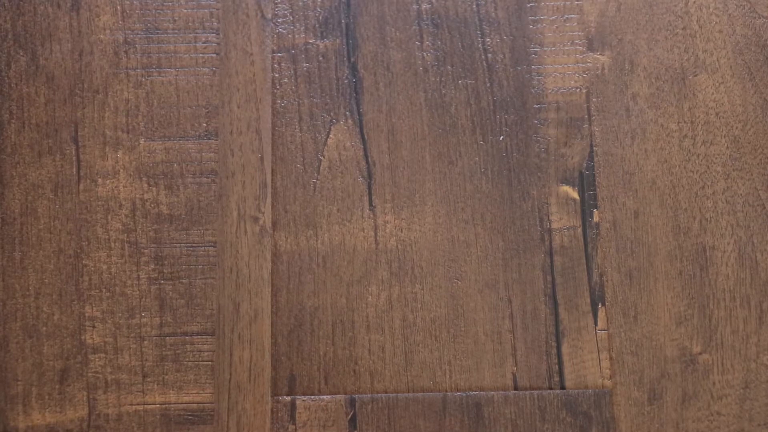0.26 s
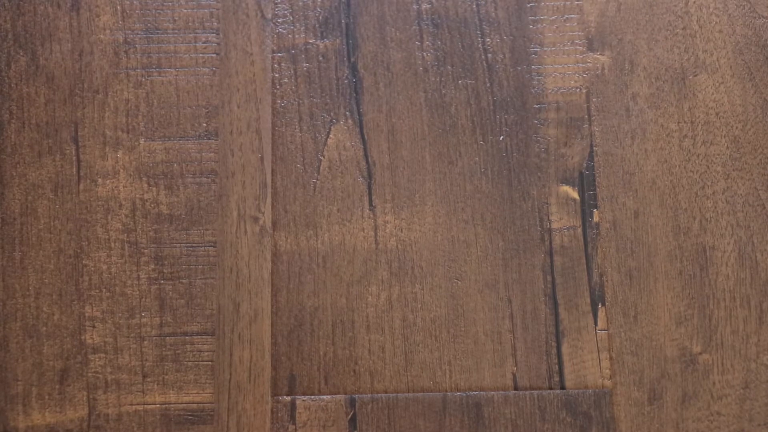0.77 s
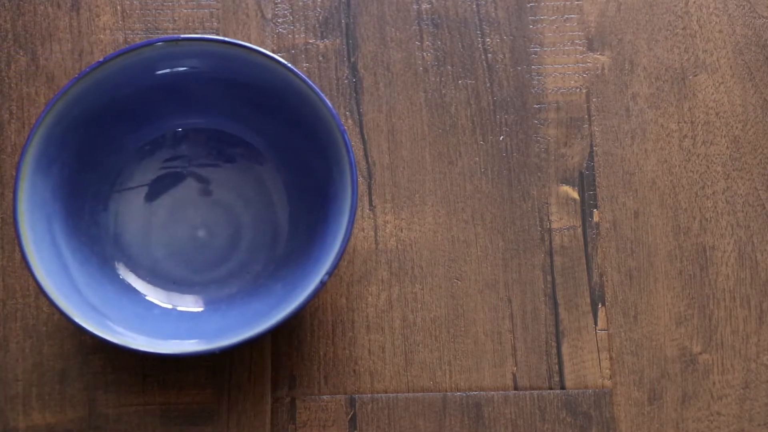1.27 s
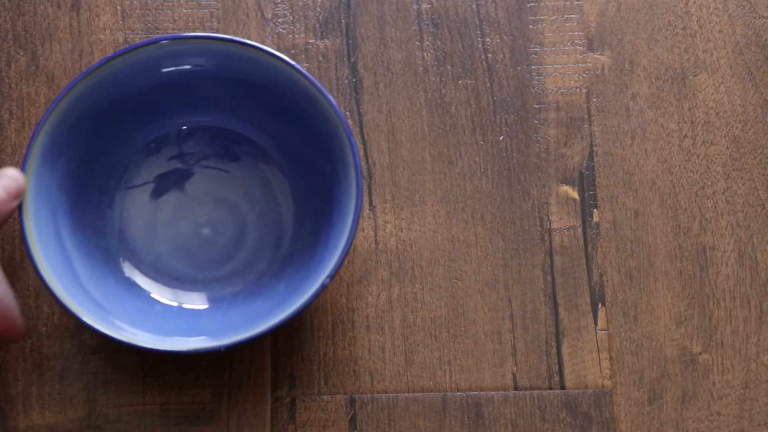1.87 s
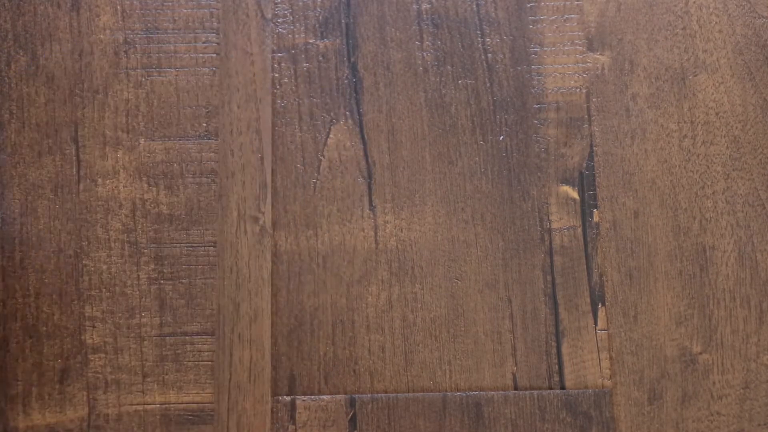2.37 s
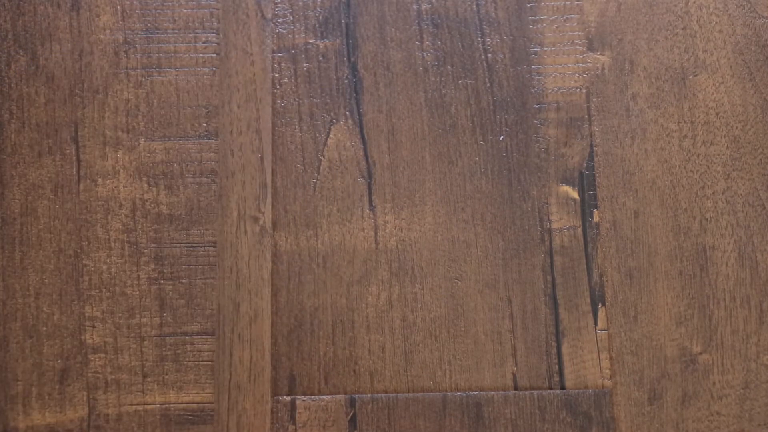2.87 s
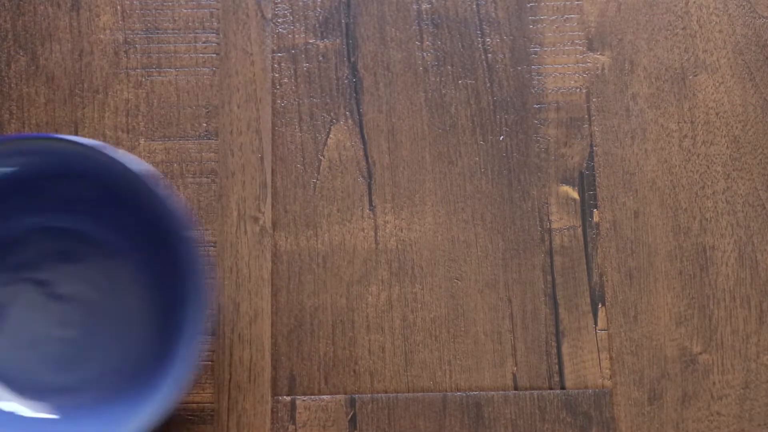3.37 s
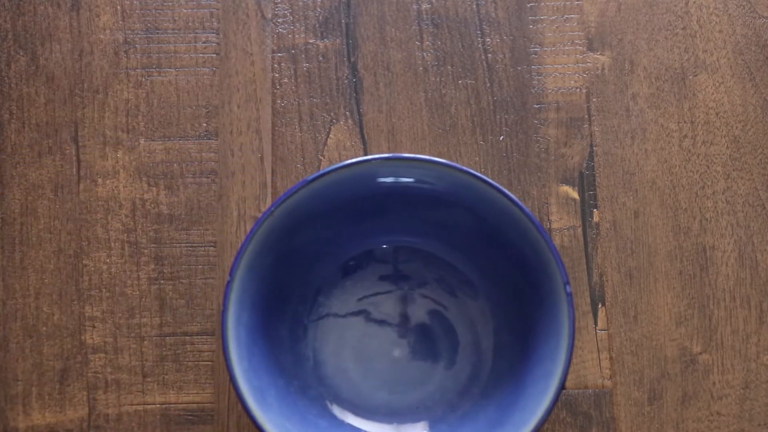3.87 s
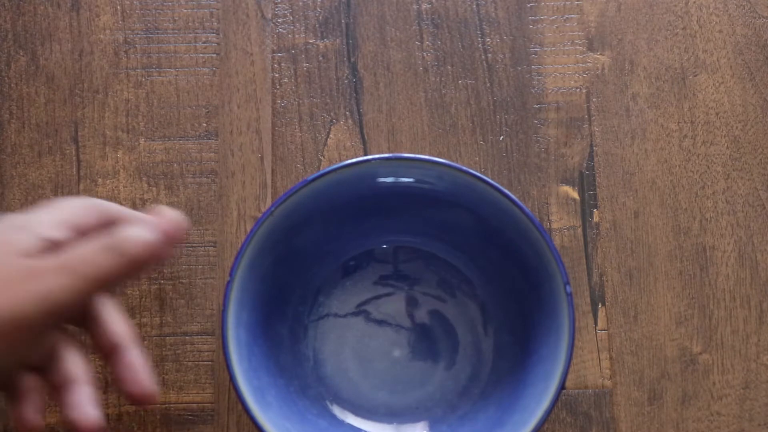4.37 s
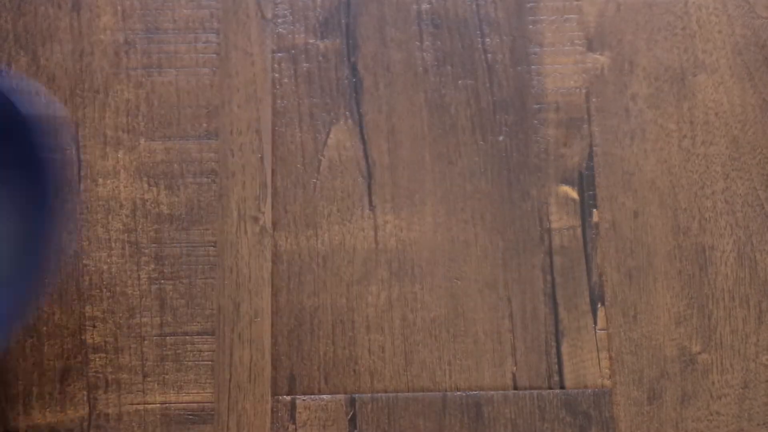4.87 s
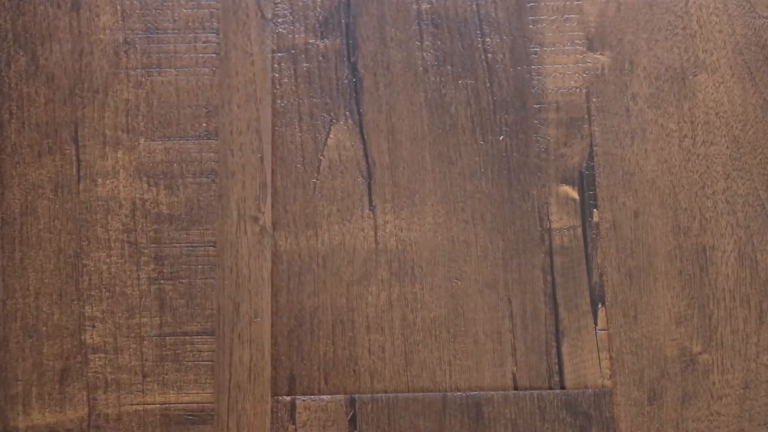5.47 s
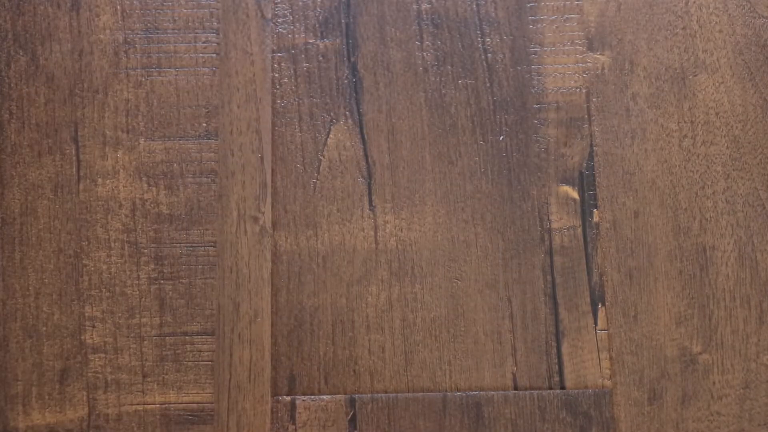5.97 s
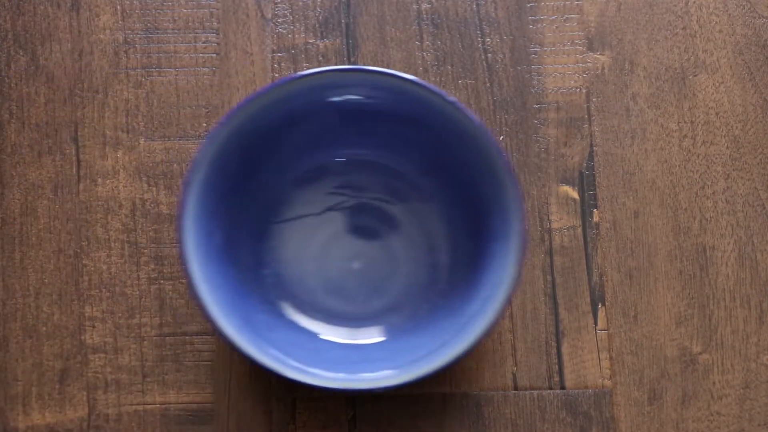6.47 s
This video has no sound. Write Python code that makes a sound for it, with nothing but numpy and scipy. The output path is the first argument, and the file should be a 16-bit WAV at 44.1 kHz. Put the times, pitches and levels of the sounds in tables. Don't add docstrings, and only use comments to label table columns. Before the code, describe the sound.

A quiet indoor room with low hum, soft hiss and faint far traffic, heard close to a wooden table. At about 0.45 s come small light taps, then from 0.7 to 1.35 s a ceramic bowl slides over the planks: a hollow rumbling scrape with gritty hiss, thin high singing and a hard knock near 0.96 s. It settles with a very faint ring. Cloth rustles softly around 1.8 s, with a tiny shift near 2 s and weak taps at 2.2 s. The second slide starts softly near 3.1 s, knocks hard at 3.36 s and bumps along until 3.85 s, leaving a faint ring. A sleeve rustles at 4.4 s; lifting clatters lightly at 4.6-4.7 s, followed by another rustle. Bumps and short chatter come at 5.5-5.8 s, a brief gap, then the third scrape from 5.95 s, with strong knocks near 6.2 s, fading by 6.7 s.

```python
import sys
import numpy as np
from scipy import signal
from scipy.fft import rfft, irfft, next_fast_len
from scipy.io import wavfile
from scipy.ndimage import uniform_filter1d, map_coordinates

SR = 44100
rng = np.random.default_rng(int(sys.argv[2]) if len(sys.argv) > 2 else 0)


def decibels_to_gain(level_db):
    exponent = np.asarray(level_db, float) / 20
    return 10 ** exponent


def log_audio(samples):
    frames = np.atleast_2d(samples).T
    limited = np.clip(frames, -1, 1)
    pcm = np.round(limited * 32767).astype(np.int16)
    wavfile.write(sys.argv[1], SR, pcm)


N = 295911

# frequency in Hz, level in dB, t60 in seconds.
LOW_MODES = [(300, -14, .02), (390, -10, .02), (460, -9, .02), (515, -8, .025), (650, -15, .016)]
HIGH_MODES = [(880, -4, .016), (1000, 0, .016), (1150, -2, .014), (1350, -9, .012)]
# frequency in Hz, level in dB per Hz.
GRAIN_SPECTRUM = [(900, -30.5), (1300, 3), (1700, 1.5), (2300, 0.5), (2900, -1.5), (3300, -4), (3600, -15),
                  (4400, -22), (6000, -32.5)]
GRIT_SPECTRUM = [(1800, -17), (2500, -4), (3100, 1.5), (3700, 0.5), (5000, -5), (7000, -9), (9000, -11.5),
                 (10500, -33), (13000, -27), (15700, -34.5)]
# time in seconds, peak in dB, rattle in dB over the knock,
# upper boom in dB over the knock, plank frequency in Hz.
KNOCKS = [(0.452, -23, -34, -23, 487), (0.475, -24.5, -28, -20, 460), (0.682, -34, -36, -29, 354),
          (0.961, -9, -16.5, -3, 453), (2.185, -31, -28, -5, 312), (2.233, -34, -25.5, -15, 520),
          (3.357, -13.5, -15.5, -18, 447), (3.369, -9.5, -33, -11, 466), (4.565, -36.5, -35, -12, 303),
          (4.587, -46, -26, -1, 620), (4.644, -18, -32, -14, 536), (4.676, -23, -27, -9.5, 476),
          (4.691, -24.5, -23, -8.5, 510), (5.464, -16, -20, -7.5, 514), (5.505, -22, -36, -9, 524),
          (5.703, -19, -22.5, -12, 514), (5.967, -21.5, -21.5, -20, 502), (6.178, -10, -18, -13, 500),
          (6.188, -10.5, -33, -10, 526), (6.201, -9.5, -23, -7.5, 490), (6.392, -11, -36, -15, 625),
          (6.622, -23.5, -34, -10.5, 500)]
PLANK_HZ, PLANK_WIDTH_HZ = 520, 9.8


def unit(x):
    return x / np.sqrt(np.mean(x ** 2) + 1e-20)


def along(points, hz):
    f, v = np.transpose(points)
    return np.interp(np.log(hz + 1), np.log(f + 1), v)


def filtered(x, response):
    m = next_fast_len(N + SR)
    hz = np.fft.rfftfreq(m, 1 / SR)
    return irfft(rfft(x, m) * response(hz), m)[:N]


def shaped(x, spectrum):
    return filtered(x, lambda hz: decibels_to_gain(along(spectrum, hz)))


def coloured(x, spectrum):
    return unit(shaped(x, spectrum))


def resonance(hz, width):
    return lambda f: 1j * f * width / (hz * hz - f * f + 1j * f * width)


def wobble(rate):
    knots = rng.standard_normal(int(N * rate / SR) + 4)
    return map_coordinates(knots, [np.arange(N) * rate / SR])


def asperities(rate, spread_db):
    touch = rng.random(N) < rate / SR
    sign = rng.choice([-1, 1], N)
    return unit(touch * sign * decibels_to_gain(spread_db * rng.standard_normal(N)))


def gains(tables):
    t = np.arange(N) / SR
    out = 0
    for rows in tables:
        s, *columns = np.transpose(rows)
        out = out + np.array([decibels_to_gain(np.interp(t, s, c, left=-200, right=-200)) for c in columns])
    return out


def dying(rows):
    t = np.arange(N) / SR
    return sum((t >= s) * decibels_to_gain(db - 60 * np.abs(t - s) / t60) for s, db, t60 in rows)


def swells(rows):
    t = np.arange(N) / SR
    return sum(decibels_to_gain(db) * np.exp(-.5 * ((t - s) / half) ** 2) for s, half, db in rows)


def ambience():
    # frequency in Hz, level in dB per Hz.
    rumble_spectrum = [(15, -47), (25, -17), (38, -2), (66, 0.5), (81, 11.5), (157, 4), (170, -33),
                       (220, -41.5), (370, -120)]
    hum_spectrum = [(90, -29.5), (140, -5.5), (280, -3), (330, 1), (430, -7.5), (800, -10), (1100, -12.5),
                    (1600, -18), (2500, -30.5), (3300, -43.5), (5500, -120)]
    hiss_spectrum = [(880, -38.5), (1500, 0), (2160, 0.5), (2310, -1.5), (3660, -2.5), (7880, -5.5),
                     (15700, -9)]
    # nearest moment in seconds, half length in seconds, level in dB.
    vehicles = [
        (0.0, .2, -84),
        (3.17, 0.16, -66),
        (3.6, 0.17, -77),
        (4.5, 0.38, -69.5),
        (6.1, .5, -77),
    ]
    # time in seconds, level in dB.
    hum_level = [(0, -66.5), (2.8, -66.5), (2.9, -62.5), (4.95, -63.5), (5.4, -67.5), (6.71, -57.5)]
    steady_traffic_db, hiss_db = -74, -74.5
    low = unit(decibels_to_gain(1.6 * wobble(4)) * coloured(rng.standard_normal(N), rumble_spectrum))
    mid = unit(decibels_to_gain(1.2 * wobble(4.3)) * coloured(rng.standard_normal(N), hum_spectrum))
    hiss = decibels_to_gain(hiss_db) * coloured(rng.standard_normal(N), hiss_spectrum)
    traffic = (decibels_to_gain(steady_traffic_db) + swells(vehicles)) * low
    return traffic + gains([hum_level])[0] * mid + hiss


def room(x):
    # frequency in Hz, t60 in seconds.
    decay = [(200, 0.282), (1000, 0.24), (4000, 0.18), (12000, 0.18)]
    hz, t, z = signal.stft(rng.standard_normal(SR // 2), SR, nperseg=256)
    fading = decibels_to_gain(-60 * t / along(decay, hz)[:, None])
    tail = signal.istft(z * fading, SR, nperseg=256)[1]
    delayed = np.pad(x, (200, 0))
    return signal.fftconvolve(delayed, tail / np.linalg.norm(tail))[:N]


def sleeve():
    # middle in seconds, half length in seconds, level in dB.
    passes = [(1.565, 0.035, -73), (1.8, 0.15, -70), (2.386, 0.031, -71.5), (4.15, 0.051, -76),
              (4.38, .1, -67.5), (4.845, 0.044, -63.5), (5.365, 0.011, -72)]
    # frequency in Hz, level in dB per Hz.
    cloth_spectrum = [(710, -45), (1200, -1), (1460, 1), (1670, 2), (5180, -3), (6150, 0), (9350, -6.5),
                      (15700, -17)]
    return swells(passes) * decibels_to_gain(1.5) * coloured(asperities(9000, spread_db=2.0), cloth_spectrum)


def specks():
    # time in seconds, peak in dB.
    cracks = [(1.002, -32), (1.078, -42), (1.967, -49), (3.127, -45.5), (3.169, -41), (4.677, -36.5),
              (6.378, -28), (6.53, -38)]
    t = np.arange(SR // 50) / SR
    out = np.zeros(N + SR)
    for (s, db), noise in zip(cracks, rng.standard_normal((len(cracks), len(t)))):
        out[round(s * SR):][:len(t)] += decibels_to_gain(db - 60 * t / 0.0044) * noise
    return filtered(out[:N], lambda hz: decibels_to_gain(.5 * along(GRIT_SPECTRUM, hz)))


def rim():
    # start in seconds, level in dB, t60 in seconds, length in seconds.
    rings = [
        (1.3, -55, 1.5, .21),
        (3.83, -55, 1.9, .42),
        (6.62, -52, 1.5, .3),
    ]
    t = np.arange(N) / SR
    level = sum(dying([(s, db, t60)]) * (t < s + length) for s, db, t60, length in rings)
    level = uniform_filter1d(level, size=2500)
    return decibels_to_gain(-4) * level * np.sin(2 * np.pi * 885 * t + .5 * wobble(10))


def plate(x, t60, db):
    t = np.arange(SR // 5) / SR
    ring = rng.standard_normal(len(t)) * decibels_to_gain(-60 * t / t60)
    return x + decibels_to_gain(db) * signal.fftconvolve(x, ring / np.linalg.norm(ring))[:N]


def ringing(modes, t, luck):
    out = 0
    for (hz, db, t60), r in zip(modes, luck):
        out = out - decibels_to_gain(db + 2.2 * r - 60 * t / t60) * np.sin(2 * np.pi * hz * t)
    return out


def thud(t, upper_db, hz, contact_s, luck):
    plank = decibels_to_gain(-60 * t / .02) * np.sin(2 * np.pi * hz * t)
    onset = (1 - np.exp(-t / contact_s)) ** 2
    low = onset * (ringing(LOW_MODES, t, luck) - plank)
    upper = onset * ringing(HIGH_MODES, t, luck[len(LOW_MODES):])
    return low / np.abs(low).max() - decibels_to_gain(upper_db) * upper / np.abs(upper).max()


def knocks():
    # time in seconds, peak in dB, plank frequency in Hz.
    ridges = [(0.493, -35, 530), (0.743, -28, 500), (0.828, -22.5, 460), (0.836, -25, 470),
              (0.915, -20.5, 592), (0.952, -15.5, 480), (0.973, -12, 500), (1.125, -21, 534),
              (1.263, -30.5, 433), (3.316, -31, 459), (3.398, -13, 524), (3.444, -18, 523),
              (3.518, -18, 607), (3.629, -27, 560), (3.714, -21.5, 513), (3.761, -21.5, 490),
              (3.774, -20, 490), (3.816, -31, 428), (5.484, -26.5, 560), (5.525, -27.5, 422),
              (5.545, -26.5, 530), (5.719, -22, 463), (5.731, -28, 495), (5.773, -32.5, 463),
              (6.219, -18, 465), (6.306, -18, 520), (6.385, -19, 574), (6.441, -18, 614), (6.473, -21, 620),
              (6.599, -25, 555)]
    knock_contact_s, ridge_contact_s = .0005, .002
    t = np.arange(SR // 10) / SR
    wood, rattle, tick = np.zeros((3, N + SR))
    modes = len(LOW_MODES) + len(HIGH_MODES)
    draws = rng.standard_normal((len(KNOCKS), modes + len(t)))
    for (s, db, rattle_db, upper_db, hz), r in zip(KNOCKS, draws):
        start = round((s + 0.000983) * SR)
        noise = r[-len(t):]
        wood[start:][:len(t)] += decibels_to_gain(db + 2.2) * thud(t, upper_db + 1.5, hz, knock_contact_s, r)
        rattle[start:][:len(t)] += decibels_to_gain(db + rattle_db + 8.5 - 60 * t / 0.037) * noise
        tick[start:][:len(t)] += decibels_to_gain(db + rattle_db - 7.5 - 60 * t / 0.0026) * noise
    for (s, db, hz), r in zip(ridges, rng.standard_normal((len(ridges), modes))):
        upper_db = -13 + 35 * np.log2(hz / 500)
        wood[round(s * SR):][:len(t)] += decibels_to_gain(db + 1) * thud(t, upper_db - 2, hz, ridge_contact_s, r)
    wood = wood[:N]
    ring_on = filtered(wood, resonance(PLANK_HZ, PLANK_WIDTH_HZ))
    small = shaped(rattle[:N], GRAIN_SPECTRUM) + shaped(tick[:N], GRIT_SPECTRUM)
    return plate(wood, t60=0.15, db=-7.0) + ring_on + small


def motion():
    # time in seconds, load on the foot ring in dB, sliding speed in dB,
    # freedom of the bowl from the hand in dB.
    slides = [
        [(0.69, -65, -91, 2), (0.755, -43, -66, 4.5), (0.825, -34.5, -57, 4), (0.955, -30, -51, 3.5),
         (1.035, -27.5, -49.5, 4), (1.121, -31, -54.5, 5), (1.295, -43, -65, 4), (1.377, -75, -76.5, -7),
         (1.45, -68, -84, -6)],
        [(2.99, -68.5, -91, 9), (3.136, -40.5, -60.5, -1.5), (3.236, -29.5, -44.5, -4.5),
         (3.366, -27.5, -45, 5.5), (3.514, -27, -50.5, 3.5), (3.666, -28.5, -51.5, 3), (3.818, -38.5, -63.5, 7),
         (3.93, -85, -77.5, -9), (4.0, -63, -89, -12)],
        [(5.94, -61.5, -85, 6), (5.976, -34.5, -69, -20), (6.018, -35, -62, -4), (6.066, -28, -46, -1),
         (6.17, -27.5, -45.5, 2), (6.346, -26, -48.5, 3.5), (6.494, -30, -54, 10), (6.608, -40.5, -61.5, 4.5),
         (6.71, -80, -76, -1)],
    ]
    # start, fullest moment and end in seconds, load in dB, speed in dB.
    nudges = [(0.453, 0.49, 0.64, -49.5, -86), (1.907, 1.976, 2.07, -49, -74.5),
              (2.188, 2.21, 2.32, -67, -80.5), (4.573, 4.629, 4.7, -37, -64), (5.467, 5.61, 5.7, -45, -70),
              (5.706, 5.77, 5.8, -42, -80)]
    rise_db, fall_db, flank_power = 22.5, 18.5, 1.17
    speed_swing, free_db = 0.44, 5
    shape = np.linspace(0, 1, 5)
    shifts = []
    for start, full, end, load, speed in nudges:
        s = np.r_[start + (full - start) * shape, full + (end - full) * shape[1:]]
        drop = np.r_[rise_db * (1 - shape) ** flank_power, fall_db * shape[1:] ** flank_power]
        shifts.append(np.c_[s, load - drop, speed - speed_swing * drop, free_db + 0 * s])
    return gains(slides + shifts)


def singing(drive):
    mode_hz = [5630, 7763, 9498, 11251, 11390, 12532, 13318, 13750, 15601]
    # width in Hz, level in dB.
    mode_rows = [(37.8, -21.5), (21.7, -1), (25.4, -1.5), (30.4, -16.5), (30.54, -18), (20, -17.5),
                 (32.4, -15), (30, -16.5), (30, -16.5)]
    share = np.linalg.norm(decibels_to_gain(np.transpose(mode_rows)[1]))
    out = 0
    for hz, (width, db) in zip(mode_hz, mode_rows):
        loudness = np.sqrt(SR / (np.pi * width)) * decibels_to_gain(db) / share
        out = out + loudness * filtered(drive * asperities(700, spread_db=2.5), resonance(hz, width))
    return out


def scrape():
    # frequency in Hz, level in dB per Hz.
    boom_spectrum = [(70, -74), (130, -41), (200, -22.5), (300, -12.5), (400, -9.5), (500, -8), (620, -6.5),
                     (760, -15), (950, -11), (1150, -14.5), (1350, -29.5), (1700, -39.5), (3000, -120)]
    # frequency in Hz, width in Hz, level in dB.
    plank_modes = [(379, 38, -8), (463, 30, -1.5), (514.6, 10, 1), (700, 8, -6), (862, 15, -7)]
    # start in seconds, level in dB, t60 in seconds.
    chatter = [(0.453, -61.5, 0.37), (2.186, -70, 0.15), (5.466, -49, 0.7), (5.704, -48, 0.34),
               (5.968, -52, 0.3)]
    grain_db, song_db, song_flutter = 6.5, -1, 4
    cling_db, cling_s = -45, 0.022
    boom, grit, free = motion()
    grain = decibels_to_gain(grain_db) * grit + dying(chatter)
    judder = 0.6 * wobble(45)
    song = grit * free * decibels_to_gain(song_db + song_flutter * judder)
    song = song + dying([(s + .001, db + rattle_db + 25 + cling_db, cling_s)
                         for s, db, rattle_db, _, _ in KNOCKS])
    planks = lambda f: 1 + sum(decibels_to_gain(db) * resonance(hz, width)(f) for hz, width, db in plank_modes)
    shaking = coloured(asperities(1500, spread_db=1.0), boom_spectrum)
    table = unit(decibels_to_gain(judder) * filtered(shaking, planks))
    fibres = plate(asperities(3000, spread_db=3.5), t60=0.028, db=-12.5)
    fibres = unit(decibels_to_gain(0.73 * judder) * coloured(fibres, GRAIN_SPECTRUM))
    hiss = unit(decibels_to_gain(0.89 * judder) * coloured(asperities(5500, spread_db=3.5), GRIT_SPECTRUM))
    long_plank = unit(filtered(table, resonance(PLANK_HZ, PLANK_WIDTH_HZ)))
    hum = decibels_to_gain(8) * dying(chatter[:-1]) * long_plank
    return hum + boom * table + grain * fibres + grit * hiss + singing(song)


def scene():
    low_cut_hz = 170
    high_pass = lambda f: (1j * f / (low_cut_hz + 1j * f)) ** 5
    bowl = scrape() + filtered(knocks(), high_pass) + rim()
    t = np.arange(N) / SR
    kept = np.clip(np.maximum(5.787 - t, t - 5.93) / .002, 0, 1)
    return ((bowl + decibels_to_gain(-11.5) * room(bowl)) * kept + sleeve() + ambience() + specks())[None]


def band_limit(x):
    return signal.sosfilt(signal.butter(12, 15820, fs=SR, output="sos"), x)


def record(dry):
    return band_limit(dry)


dry = scene()
out = record(dry)
log_audio(out)
```